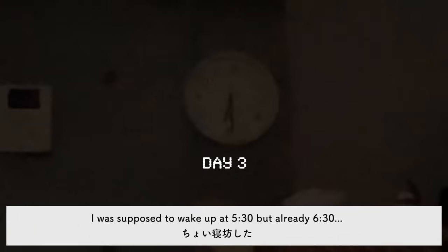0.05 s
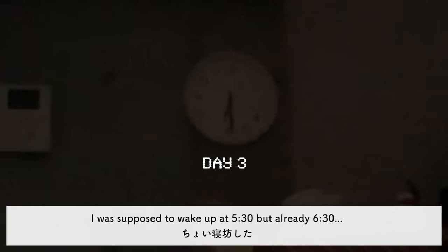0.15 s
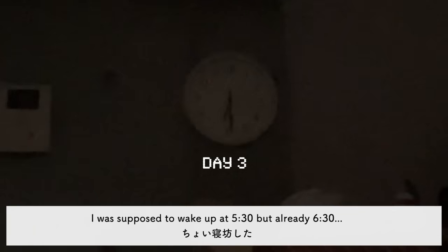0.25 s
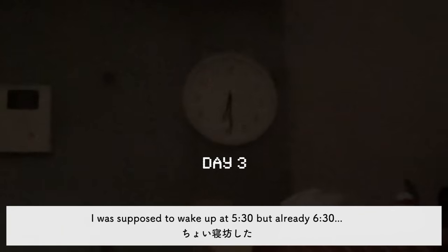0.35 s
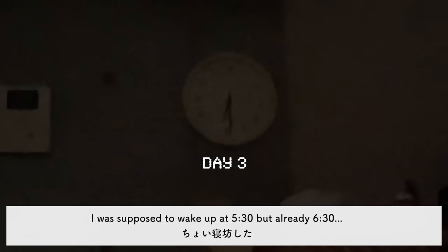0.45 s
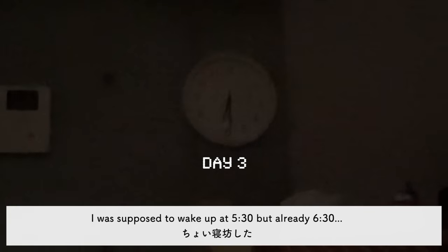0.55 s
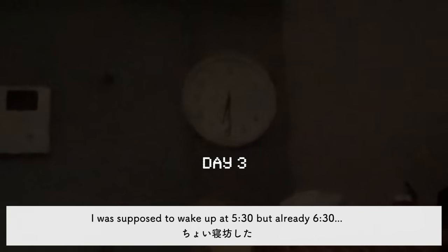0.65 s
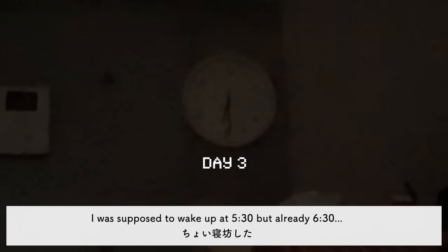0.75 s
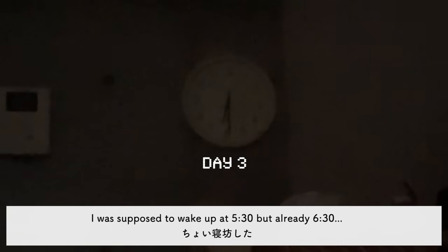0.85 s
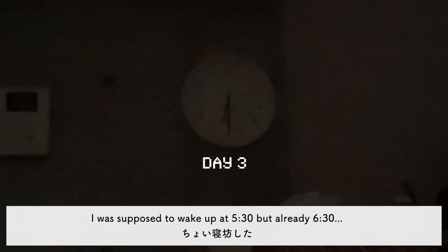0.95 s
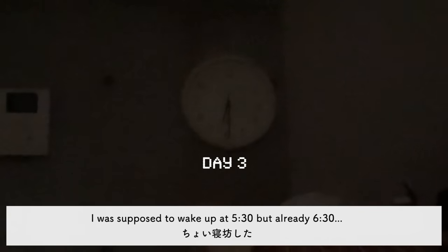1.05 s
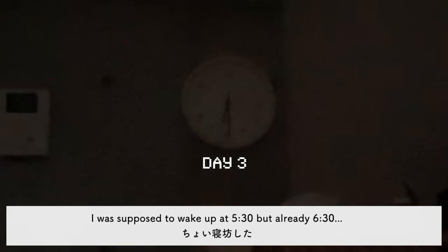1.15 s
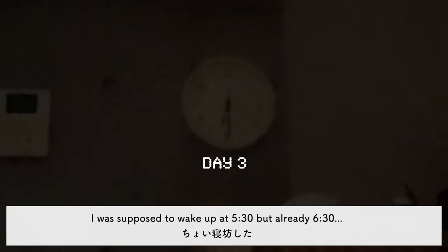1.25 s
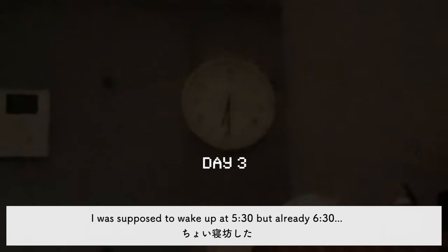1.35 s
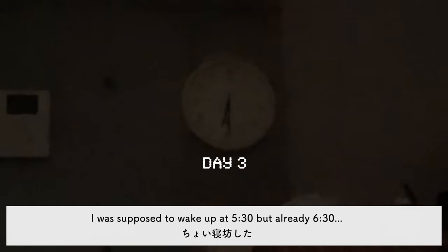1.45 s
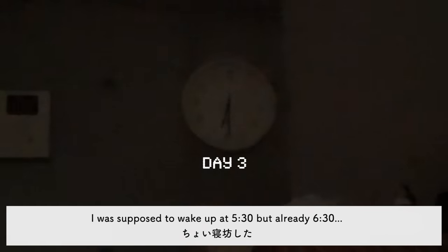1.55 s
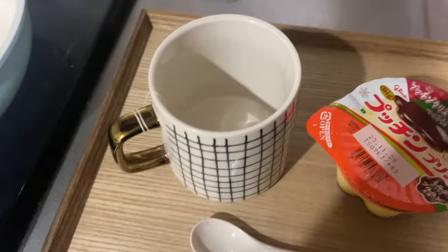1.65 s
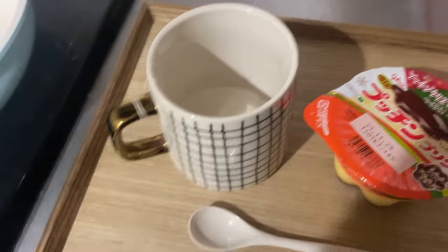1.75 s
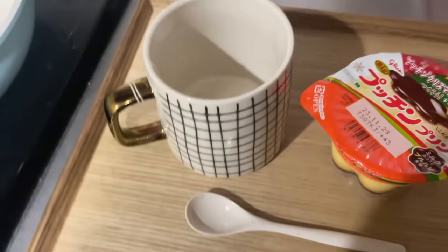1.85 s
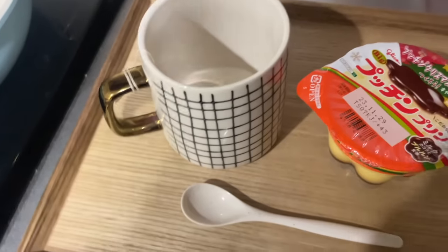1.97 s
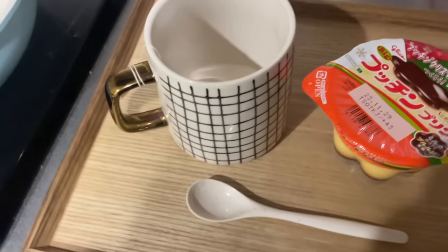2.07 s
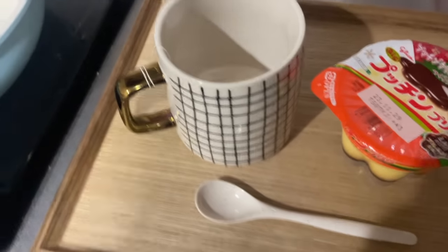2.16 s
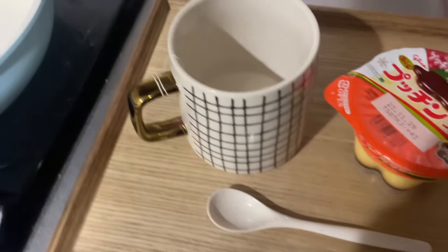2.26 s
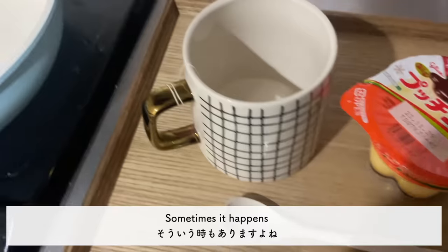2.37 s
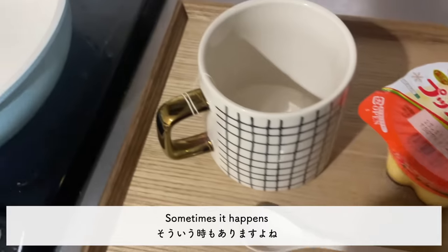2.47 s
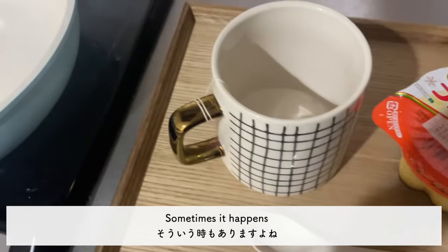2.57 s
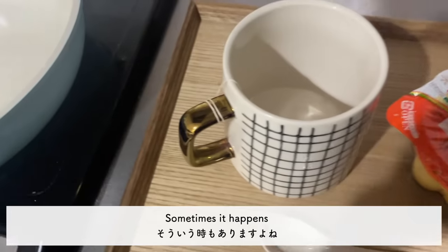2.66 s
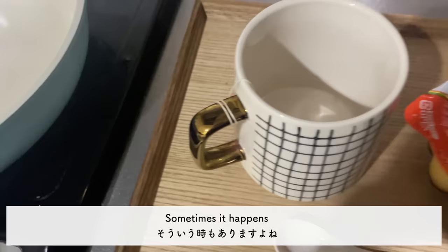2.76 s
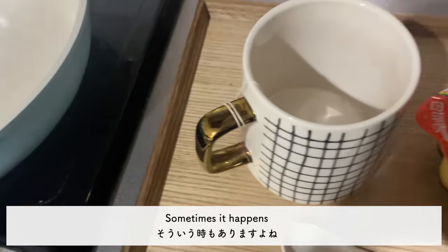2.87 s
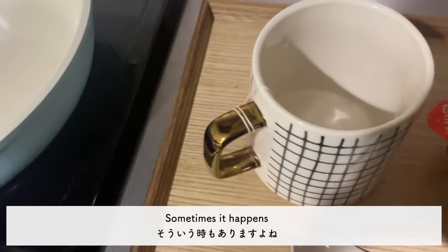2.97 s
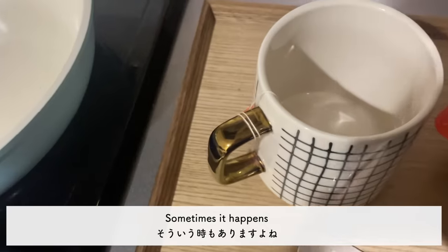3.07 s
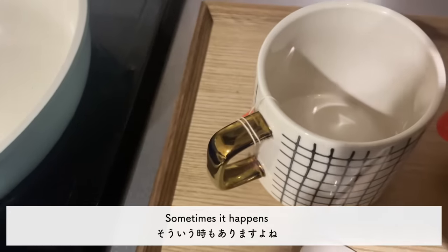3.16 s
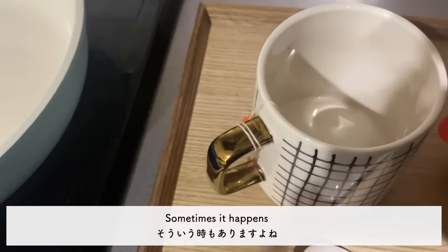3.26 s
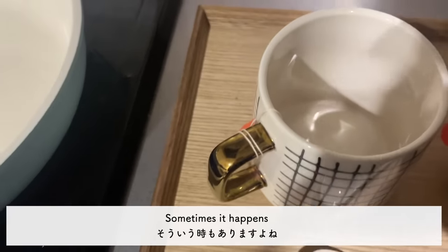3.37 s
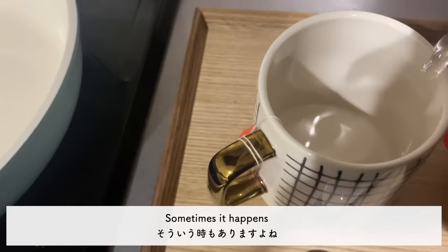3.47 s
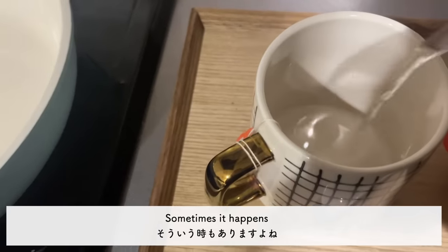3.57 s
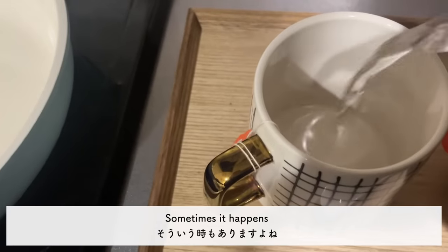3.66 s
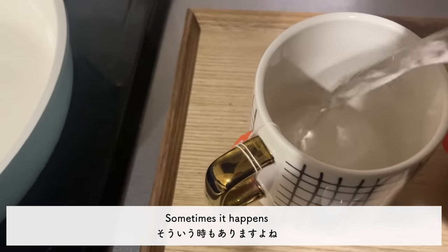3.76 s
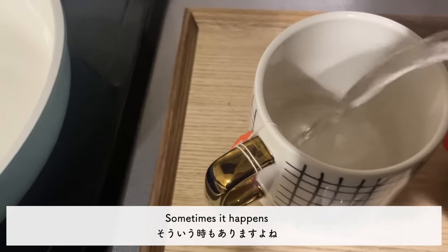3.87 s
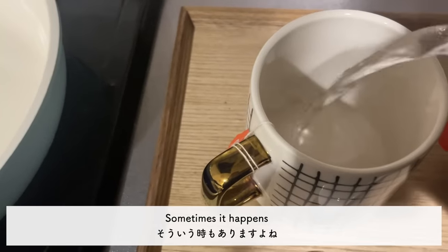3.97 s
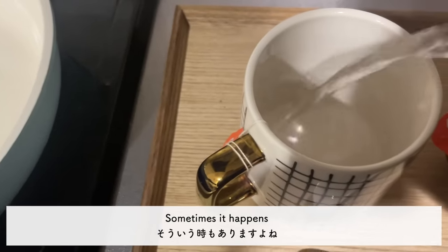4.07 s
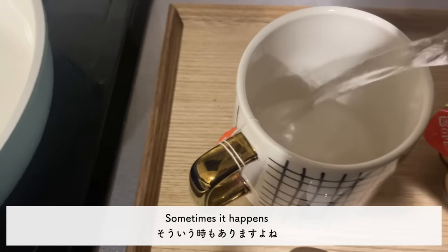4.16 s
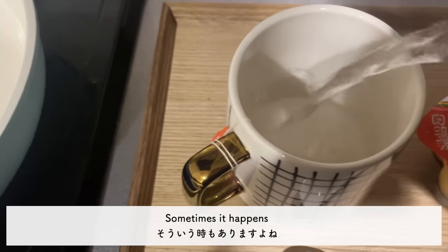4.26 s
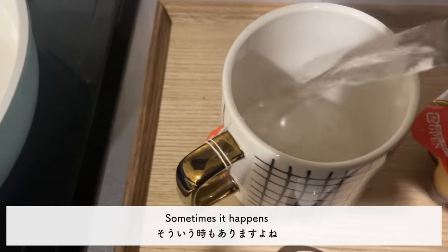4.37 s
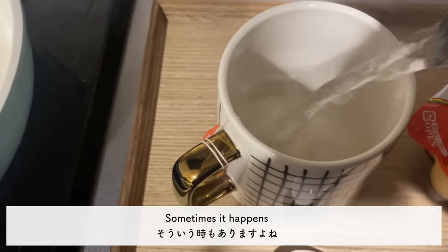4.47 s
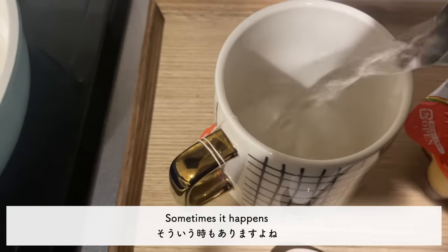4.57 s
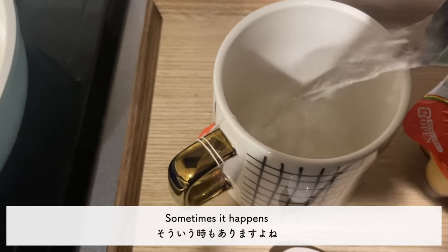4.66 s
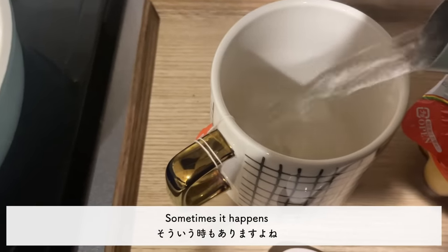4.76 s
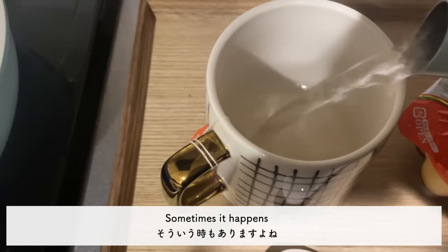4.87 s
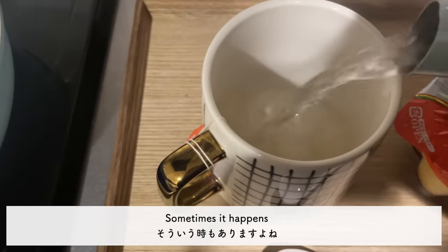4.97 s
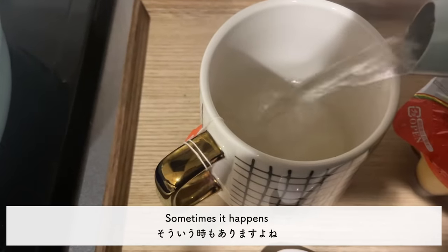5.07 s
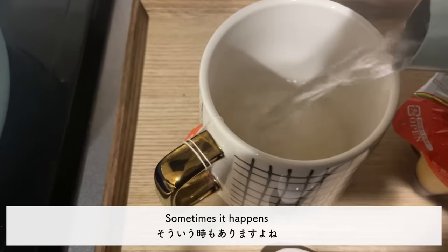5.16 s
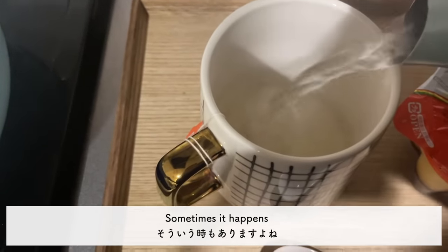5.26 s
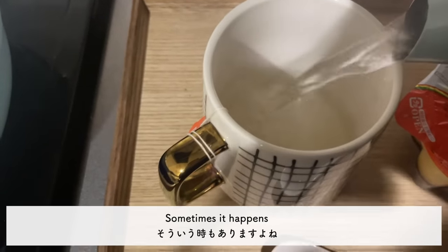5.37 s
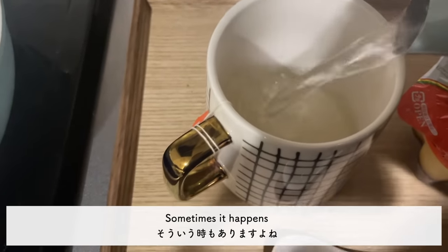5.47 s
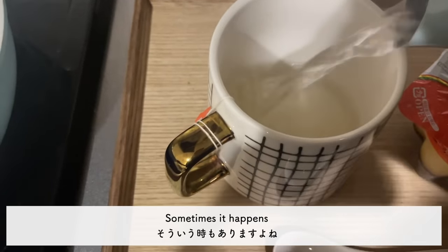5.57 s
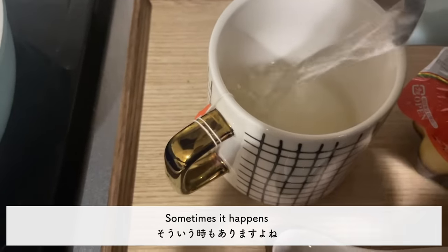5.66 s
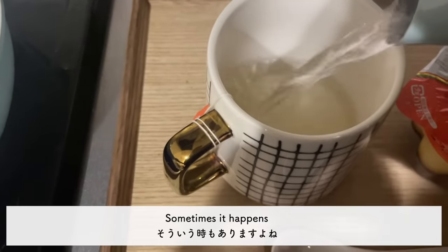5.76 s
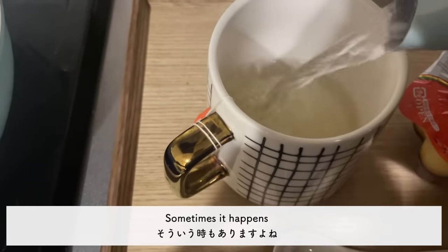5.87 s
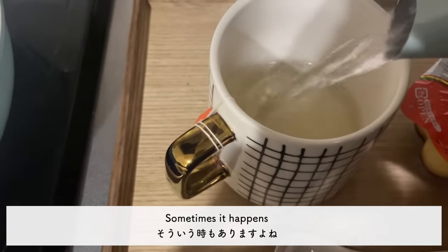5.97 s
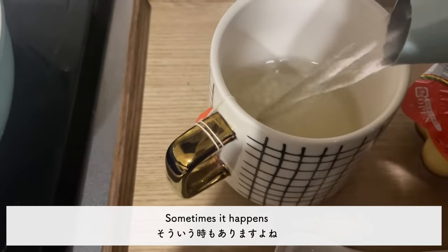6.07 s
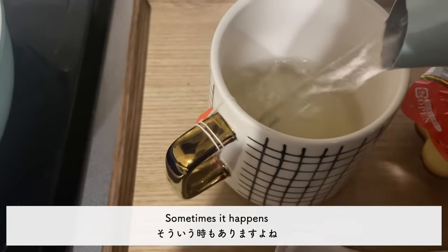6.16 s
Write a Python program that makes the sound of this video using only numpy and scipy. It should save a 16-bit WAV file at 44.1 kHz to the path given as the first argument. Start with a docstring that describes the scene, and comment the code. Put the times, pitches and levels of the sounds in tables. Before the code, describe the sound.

Near-silence breaks into low kitchen rumble with floor thuds and small clicks, a firm kettle knock, then water splashing and gurgling into a ceramic mug.

```python
"""Pouring water into a mug

A hushed room gives way at once to a kitchen with a low rumble: low thuds on the floor and under a kettle's knock,
light clicks and rustles, made of filtered noise and dying modes. Water then pours into a ceramic mug: grains of noise
spatter on the bare bottom, then decaying sines plop as cavities that widen further while the water deepens. All but
the clear bubbles and deep glugs ring the mug and its air column; a close pair of microphone ports hears the pour."""
import sys
import numpy as np
from scipy import signal
from scipy.fft import rfft, irfft, next_fast_len
from scipy.io import wavfile
from scipy.ndimage import uniform_filter1d

SR = 44100
rng = np.random.default_rng(int(sys.argv[2]) if len(sys.argv) > 2 else 0)


def field_ratio(decibels):
    """Amplitude ratio for a level in dB (20 dB per decade); scalars and array-likes work."""
    return 10 ** (np.asarray(decibels, dtype=float) / 20)


def generate_wav(signal):
    """Clip the signal to [-1, 1] and save it as 16-bit WAV at the path in sys.argv[1]."""
    frames = np.transpose(np.atleast_2d(signal))
    scaled = np.clip(frames, -1, 1) * 32767
    pcm = np.round(scaled).astype(np.int16)
    wavfile.write(sys.argv[1], SR, pcm)


N = 274335

KITCHEN_S = 1.667  # the hush ends and the kitchen begins
HUSH_DB, KITCHEN_DB = -60.5, -54  # background levels
# Noise of the hushed room. Each row: frequency in Hz, relative density in dB per Hz.
HUSH_TONE = [(15, -25), (25, -8), (60, -1.5), (90, -7), (103, -15.5), (153, -17.5), (184, -25.5),
             (228, -22), (290, -28.5), (679, -30.5), (755, -28.5), (1190, -34), (2080, -45.5),
             (13400, -60.5), (14500, -61)]
# Noise of the kitchen. Each row: frequency in Hz, relative density in dB per Hz.
KITCHEN_TONE = [(59, -26), (100, -0.5), (209, -18), (281, -15.5), (457, -23), (682, -26), (791, -20),
                (977, -28.5), (1340, -32), (1590, -38.5), (2220, -43.5), (2690, -49.5), (7410, -63.5),
                (13100, -55.5), (15500, -79)]
# Course of the low rumble of the kitchen floor. Each row: time in seconds, level in dB.
RUMBLE_LEVEL = [(1.67, -42.5), (1.95, -50), (2.3, -51.5), (2.48, -63.5), (2.57, -50.5), (3.04, -48.5),
                (3.13, -56.5), (3.3, -49), (3.7, -48), (4.3, -49.5), (4.7, -47.5), (5.0, -46.5), (5.5, -55),
                (6.22, -48)]
# Colour of the rumble. Each row: frequency in Hz, relative density in dB per Hz.
RUMBLE_TONE = [(15, -18.5), (25, 2), (38, -15.5), (59, 7.5), (119, -13), (150, -8), (206, -35.5),
               (272, -15.5), (350, -34.5), (460, -61.5), (770, -120)]
# Likeness of the room noise in the two channels. Each row: frequency in Hz, correlation from 0 to 1.
ROOM_SAME = [(60, 0.93), (180, 0.87), (550, 0.45), (1650, 0.028), (4970, 0.23), (15000, 0.08)]
# Balance of the room noise. Each row: frequency in Hz, left minus right in dB.
ROOM_TILT = [(60, -2), (240, -2.5), (950, 0), (3770, 2), (15000, -0.5)]
# Low thuds: on the floor, and under the kettle's knock.
# Each row: start in seconds, level in dB, push frequency in Hz, push share from 0 to 1.
THUDS = [(1.666, -26, 152, 0.2), (1.722, -23, 159.6, 0.27), (1.865, -35, 144, 0.67),
         (2.008, -49, 335, 0.68), (2.029, -54, 325, 0.73), (2.033, -33, 83, 0.95), (2.305, -47, 306, 0.77),
         (2.842, -65, 207, 0.3), (3.209, -42, 250, 0.48), (3.461, -25, 68.6, 0.58),
         (3.5, -19.5, 97.6, 0.62), (3.599, -29.5, 57.5, 0.75)]
# Modes of the floorboards. Each row: frequency in Hz, relative level in dB, 60 dB decay time in seconds.
FLOORBOARDS = [(51.4, -7.5, 0.31), (110.6, -11.5, 0.63), (144.9, -2.5, 0.24), (152.8, -4, 0.38),
               (270, -16, 0.13), (359.9, -7.5, 0.1), (335, -20, 0.11), (401.6, -14, 0.12),
               (542, -25, 0.062), (808, -30, 0.087)]
# Light clicks. Each row: start in seconds, level in dB before CLICK_TONE, centre in Hz,
# 60 dB decay time in seconds, left minus right in dB.
CLICKS = [(1.757, -55.5, 1556, 0.12, 3), (2.021, -45, 4060, 0.021, -2), (2.023, -54, 2380, .04, -1),
          (2.294, -57, 2000, 0.022, 1.5), (2.3, -39, 1770, 0.02, -11), (2.303, -52.5, 794, 0.024, 14.5),
          (2.308, -51, 2200, 0.048, 3), (2.317, -43, 3630, 0.0098, -7), (2.608, -67.5, 12900, 0.0125, 4.5),
          (2.692, -58, 1800, 0.0154, 1.5), (2.7, -48.5, 968, 0.0115, -14), (2.7, -50, 1600, 0.034, 5),
          (2.727, -58, 1990, 0.0145, 1), (2.754, -61, 2200, 0.012, 10), (3.518, -48.5, 1600, 0.31, 4)]
# Narrow pings. Each row: start in seconds, level in dB before CLICK_TONE, centre in Hz,
# 60 dB decay time in seconds, left minus right in dB.
PINGS = [(0.702, -65, 1080, 0.1, -1), (2.022, -56, 920, 0.034, -0.5), (2.3015, -48, 770, 0.023, 2),
         (2.305, -44.5, 1170, 0.062, 1), (2.7, -55, 950, 0.046, -6), (2.548, -67, 1380, 0.17, 4.5),
         (3.557, -62, 6740, 0.125, 22)]
# How sharp sounds reach the microphone. Each row: frequency in Hz, gain in dB.
CLICK_TONE = [(200, -8), (800, 2), (6500, -7.5), (8600, -14.5), (10500, -13), (13200, 3.5), (16000, -24)]
# Rustles of things being moved. Each row: start, swell and fade in seconds, peak level in dB.
RUSTLES = [(1.666, 0.0096, 0.46, -83), (1.75, 0.011, 0.065, -67.5), (2.06, 0.059, 0.067, -71.5),
           (2.336, 0.0078, 0.12, -73), (3.121, 0.13, 0.78, -74)]
# Colour of the rustles. Each row: frequency in Hz, relative density in dB per Hz.
RUSTLE_TONE = [(880, -10.5), (1500, -6.5), (2380, -13), (2890, -10.5), (3500, -10.5), (6490, -15.5),
               (8250, -33.5), (13100, -15.5), (15000, -54)]
# Knocks of the kettle on its stand. Each row: start in seconds, level in dB, treble emphasis in dB,
# length of the blow in seconds, freedom of the stand as a factor on its decay times.
KNOCKS = [(3.453, -28, -3, 0.0028, 0.3), (3.4845, -22, 4, 0.00088, 0.38), (3.488, -14, -5, 0.00069, 0.67),
          (3.501, -30.5, -11.5, 0.0025, 0.56), (3.514, -31.5, -0.5, 0.003, .7),
          (3.522, -32.5, -18, 0.0024, 0.79), (3.538, -35.5, -21, 0.0036, 0.92),
          (3.562, -37, -18.5, 0.002, 0.95)]
# Modes of the stand. Each row: frequency in Hz, relative level in dB, 60 dB decay time in seconds when free.
STAND = [(269, -12.5, 0.12), (396, -9, 0.11), (548, 3, 0.026), (600, -11.5, 0.0167), (673, 5.5, 0.027),
         (830, -1, 0.031), (1000, -19, 0.022), (1260, 0, 0.029), (1600, -15, 0.018), (2000, -6.5, 0.026),
         (2070, -15, 0.02), (2333, -5, 0.024), (2800, -16, 0.01)]
# Noise of the impact. Each row: frequency in Hz, relative density in dB per Hz.
CRACK_TONE = [(180, -17.5), (300, -6.5), (1310, -16.5), (1790, -40), (2280, -33), (2730, -25.5),
              (6620, -40.5), (8600, -56), (12500, -37.5), (15000, -74)]
# Balance of the knocks. Each row: frequency in Hz, left minus right in dB.
HANDS_TILT = [(60, 5), (110, -3), (200, -8), (380, -5), (700, -1), (1290, 8), (2380, 4), (4400, 13.5),
              (8120, 10), (15000, -2)]
# Reverberation of the kitchen. Each row: frequency in Hz, 60 dB decay time in seconds.
KITCHEN_TAIL = [(250, 0.36), (660, 0.14), (1740, 0.068), (4590, 0.09), (10000, 0.035)]
# The stream thickens, then the deepening water muffles the spatter.
# Each row: time in seconds, spatter level and gurgle level in dB, both before the mug's resonances.
STREAM = [(3.77, -80, -84), (3.84, -68, -82), (3.9, -69, -92), (4.0, -61, -75), (4.16, -60.5, -89),
          (4.18, -54.5, -69), (4.25, -61.5, -87), (4.3, -52, -78), (4.38, -56.5, -83), (4.395, -43, -82),
          (4.47, -46, -69.5), (4.56, -56.5, -64), (4.63, -52, -58), (4.82, -46.5, -57.5),
          (5.05, -59, -62.5), (5.25, -56.5, -64), (5.6, -58, -65), (5.93, -57, -66.5), (6.22, -64, -69)]
# Colour of the spatter. Each row: frequency in Hz, relative density in dB per Hz.
SPATTER_TONE = [(900, -11.5), (1500, -12), (2200, -12.5), (3000, -14), (4800, -8), (7000, -15.5),
                (9000, -8), (11000, -6.5), (13500, -0.5), (15300, -4), (15800, -11), (16200, -40)]
# Sharpest drops on the surface. Each row: start in seconds, level in dB before SPATTER_TONE, centre in Hz.
DROPS = [(3.779, -43.5, 2370), (3.838, -36.5, 3560), (3.975, -35.5, 2370), (4.026, -42, 3000),
         (3.871, -35.5, 13400), (3.952, -37, 12800), (4.013, -29, 2360), (4.091, -34.5, 2190),
         (4.116, -46, 14100), (4.127, -44, 3500), (4.149, -36.5, 5000), (4.171, -24.5, 5100),
         (4.182, -34, 6360), (4.219, -31, 4500), (4.258, -36, 6500), (4.275, -30, 12900),
         (4.346, -31, 2970), (4.389, -27.5, 3000), (4.442, -25, 2590), (4.457, -14, 13700),
         (4.478, -23, 12500), (4.496, -15, 3850), (4.511, -26, 3260), (4.537, -25.5, 2630),
         (4.602, -25, 2890), (4.665, -25, 2560), (4.712, -35, 4730), (4.756, -22, 3520),
         (4.832, -23.5, 13000), (4.879, -25.5, 3040), (4.926, -36, 13000), (4.935, -35, 12500),
         (4.96, -30, 6000), (5.053, -33, 13000), (5.09, -41, 12500), (5.126, -32, 13000),
         (5.175, -39, 13000), (5.213, -36, 13000), (5.343, -37, 7000), (5.403, -27, 13000),
         (5.446, -23, 7100), (4.972, -22, 2435), (5.007, -21.5, 11800), (5.102, -27, 3100),
         (5.12, -36, 13000), (5.235, -21.5, 13460), (5.302, -28, 12100), (5.357, -35, 12000),
         (5.392, -24.5, 3440), (5.436, -28, 3170), (5.48, -23.5, 13570), (5.547, -26.5, 12800),
         (5.612, -28, 7240), (5.735, -20.5, 10700), (5.517, -29, 12500), (5.589, -33, 13000),
         (5.64, -29, 13000), (5.685, -36, 12500), (5.767, -32, 12500), (5.789, -34, 13000),
         (5.8, -32, 12000), (5.808, -30, 13000), (5.828, -26.5, 3170), (5.9, -34, 12500),
         (5.977, -31, 13000), (5.995, -28, 13000), (6.103, -30.5, 13000), (6.165, -38, 13000),
         (6.196, -30, 13000), (5.962, -31, 3000), (5.984, -29, 3050), (6.026, -18.5, 4600)]
# Distinct plops of air pockets closing under the surface. Each row: start in seconds, level in dB before
# the mug's resonances, nominal pitch in Hz.
PLOPS = [(4.223, -30, 2360), (4.29, -34, 1460), (4.305, -47.5, 2300), (4.354, -41, 2200),
         (4.434, -23.5, 2520), (4.533, -38, 830), (4.596, -29.5, 2350), (4.585, -36, 1500),
         (4.611, -26, 1910), (4.666, -22, 1720), (4.818, -26.5, 1460), (4.93, -29, 1150),
         (4.961, -33.5, 900), (4.99, -33.5, 1000), (5.0, -24.5, 1690), (5.018, -42, 896),
         (5.043, -35.5, 890), (5.055, -38, 1000), (5.109, -31.5, 1180), (5.133, -31, 1700),
         (5.143, -25.5, 1360), (5.157, -33.5, 1600), (5.172, -38, 1110), (5.202, -30, 1040),
         (5.214, -21.5, 1050), (5.242, -29.5, 950), (5.263, -26.5, 1170), (5.236, -27, 1216),
         (5.269, -32, 964), (5.278, -40, 1000), (5.284, -31, 1300), (5.299, -32, 1160), (5.316, -36, 1220),
         (5.328, -38, 1110), (5.344, -32.5, 960), (5.37, -39, 945), (5.396, -39, 1240), (5.36, -32, 955),
         (5.409, -35, 965), (5.438, -31, 1393), (5.446, -25.5, 930), (5.457, -32.5, 870),
         (5.481, -35, 1050), (5.498, -35, 1000), (5.518, -24.5, 2130), (5.533, -30.5, 1040),
         (5.56, -43, 1000), (5.59, -28.5, 819), (5.617, -37.5, 1000), (5.634, -38.5, 1300),
         (5.64, -28, 780), (5.685, -24.5, 950), (5.73, -35, 1000), (5.741, -42, 660), (5.766, -24.5, 880),
         (5.695, -38.5, 1600), (5.789, -27.5, 1000), (5.808, -32.5, 990), (5.841, -28, 1000),
         (5.853, -40, 970), (5.863, -41, 950), (5.9, -33, 1280), (5.903, -34.5, 932), (5.917, -28.5, 903),
         (5.943, -43, 950), (5.957, -37, 906), (5.977, -35, 1000), (5.985, -37, 1000), (5.996, -37.5, 1000),
         (6.018, -30, 1500), (6.028, -22.5, 1050), (6.038, -36, 1120), (6.06, -31, 1050),
         (6.072, -31.5, 1050), (6.089, -38, 1380), (6.103, -28.5, 1050), (6.119, -37, 890),
         (6.152, -37, 1240), (6.196, -28.5, 796)]
# Bubbles that ring clearly. Each row: start in seconds, level in dB, starting pitch in Hz.
BUBBLES = [(4.181, -39.5, 1970), (4.188, -36, 2670), (4.397, -36, 2800), (4.402, -32, 2640),
           (4.448, -32.5, 2350), (4.461, -42, 826), (4.623, -42, 882), (4.636, -42, 1081),
           (4.65, -38, 1250), (4.672, -32, 1050), (4.679, -40, 1240), (4.692, -30.5, 1100),
           (4.719, -43, 1120), (4.733, -33, 840), (4.759, -31.5, 835), (4.782, -29.5, 1220),
           (4.789, -35, 1290), (4.808, -36.5, 800), (4.844, -54, 850), (4.882, -36, 1220),
           (4.895, -36, 1096), (4.914, -39.5, 808), (4.935, -52, 1062)]
# Modes of the mug and its air. Each row: frequency in Hz, bandwidth in Hz, gain in dB.
MUG = [(1050, 150, -1.5), (1260, 240, -9), (1625, 280, -4.5), (2350, 92, -4), (2890, 183, 0),
       (3170, 680, -4.5), (4460, 66, -4), (7020, 606, 7)]
# Balance of the pour at the ports. Each row: frequency in Hz, left minus right in dB.
PORT_TILT = [(300, 0), (950, 5), (2400, 2.5), (6000, 3.5), (15000, -0.5)]
# Phase between the ports. Each row: frequency in Hz, radians by which left leads at a lead factor of 1.
PORT_LEAD = [(100, 0), (950, .1), (2150, .9), (3800, 1.7), (5200, 1.5), (6200, -1.4), (7580, -2.6),
             (10100, -3.9), (13000, -6.1), (16400, -6.5)]

POUR_S = STREAM[0][0]  # the water arrives
# the hollow dug by the jet grows louder until HOLLOW_S, when it has this pitch and gain; it sinks throughout
HOLLOW_S, HOLLOW_HZ, SINK_HZ_PER_S, HOLLOW_DB, GROW_DB_PER_S = 5.63, 466, 117, 17, 17


def evened(x):
    """Normalisation: equal mean power, at rms 1."""
    return x / np.sqrt(np.mean(x ** 2) + 1e-20)


def read(points, hz):
    """Spectral interpolation along a logarithmic frequency axis."""
    f, value = np.transpose(points)[:2]
    return np.interp(np.log(hz + 1), np.log(f + 1), value)


def curve(rows, axis=1):
    """Linear interpolation in time of one column of a table."""
    rows = np.array(rows)
    return np.interp(np.arange(N) / SR, rows[:, 0], rows[:, axis])


def add(mix, s, sound):
    """Superposition: pressures sum from time s onward."""
    part = mix[..., round(s * SR):][..., :sound.shape[-1]]
    part += sound[..., :part.shape[-1]]


def sides(db, tilt_db):
    """Level difference between the channels: left and right gains about a mean of db."""
    return field_ratio(db + np.array([[tilt_db / 2], [-tilt_db / 2]]))


def drift(size):
    """Slow random fluctuation of rms 1: noise averaged twice over size samples."""
    return evened(uniform_filter1d(uniform_filter1d(rng.standard_normal(N), size), size))


def colour(x, points):
    """Minimum-phase filtering: a causal response follows from its log-magnitude spectrum."""
    hz = abs(np.fft.fftfreq(4096, 1 / SR))
    log_gain = np.log(field_ratio(np.maximum(read(points, hz), -100)))
    taps = np.fft.ifft(np.exp(np.conj(signal.hilbert(log_gain)))).real[:2048]
    return signal.oaconvolve(x, taps)[:len(x)]


def resonate(x, hz, width):
    """Resonance of unit gain by heterodyne: shift hz down to zero, smooth, shift back."""
    turn = np.exp(2j * np.pi * np.cumsum(hz * np.ones(len(x))) / SR)
    r = np.exp(-np.pi * width / SR)
    return 2 * (turn * signal.lfilter([1 - r], [1, -r], x / turn)).real


def burst(hz, t60, spread, rise):
    """Transient noise: a band around hz swells briefly and decays exponentially, peak 1."""
    t = np.arange(min(SR // 8, round(SR * max(1.5 * t60, 0.045)))) / SR
    puff = resonate(rng.standard_normal(len(t)), hz, spread * hz)
    puff = resonate(puff, hz, 2 * spread * hz)
    puff = puff * field_ratio(-60 * t / t60) * (1 - np.exp(-t / rise))
    return puff / abs(puff).max()


def ring(modes, blur, rough, uneven_db, detune):
    """Modal vibration: a ragged blow of about blur seconds excites decaying modes, peak 1."""
    t = np.arange(SR // 2) / SR
    sound = np.zeros(len(t))
    for hz, db, t60 in modes:
        # each blow lands elsewhere and wakes the modes differently
        luck_db, luck_hz = rng.uniform(-1.1, 1, 2)
        decay = field_ratio(db + uneven_db * luck_db - 60 * t / t60)
        tone = decay * np.sin(2 * np.pi * hz * (1 + detune * luck_hz) * t)
        ragged = rng.standard_normal(2000) * (t * np.exp(-t / blur))[:2000]
        rattle = signal.fftconvolve(tone, ragged / np.linalg.norm(ragged))[:len(t)]
        sound += tone * (1 - np.exp(-t / blur)) ** 2 + rough * rattle
    return sound / abs(sound).max()


def pocket(hz, cycles, fall):
    """Bubble resonance: enclosed air rings a few cycles, its pitch falling by the share fall as it widens."""
    t = np.arange(SR // 25) / SR
    turns = np.cumsum(hz * (1 - fall + fall * np.exp(-t * hz / 1.93))) / SR
    onset = 1 - np.exp(-turns / 0.5)  # in cycles
    return np.sin(2 * np.pi * turns) * np.exp(-turns / cycles) * onset


def pockets(low_hz, high_hz, count, cycles):
    """Bubble sizes in geometric series; most slide up in pitch as they rise."""
    glides = rng.uniform(-0.18, 0.012, size=count)
    return [pocket(hz, cycles, g) for hz, g in zip(np.geomspace(low_hz, high_hz, num=count), glides)]


def scatter(per_s, spread_db, clump_db, templates):
    """Random point process: grains of several kinds come in clumps and a few are large."""
    size_db = spread_db * np.minimum(rng.exponential(1, N), 3.5) + clump_db * drift(500)
    size = field_ratio(size_db) * (rng.random(N) < per_s / SR)
    kind = rng.integers(0, len(templates), N)
    return evened(sum(signal.oaconvolve(size * (kind == k), g)[:N] for k, g in enumerate(templates)))


def ports(x, tilt, lead):
    """Spaced reception: two microphone ports hear a source with different phase and colour."""
    size = next_fast_len(N)
    hz = np.fft.rfftfreq(size, 1 / SR)
    half = field_ratio(read(tilt, hz) / 2) * np.exp(0.5j * lead * read(PORT_LEAD, hz))
    return irfft(rfft(x, size) * np.array([half, 1 / half]), size)[:, :N]


def air(points, patchy_db, size=2048):
    """Partly coherent room noise: random short-time spectra with drifting patches, in two channels."""
    frames, hz = 4 * N // size + 5, np.fft.rfftfreq(size, 1 / SR)
    a, b, c, d, patches = rng.standard_normal((frames, len(hz), 5)).T
    patches = evened(uniform_filter1d(uniform_filter1d(patches, size=8, axis=0), size=8, axis=1))
    same = read(ROOM_SAME, hz)[:, None]
    left = a + 1j * b
    right = same * left + np.sqrt(1 - same ** 2) * (c + 1j * d)
    tilt_db = read(ROOM_TILT, hz)[:, None] / 2
    gain_db = read(points, hz)[:, None] + patchy_db * patches + np.array([tilt_db, -tilt_db])
    z = np.array([left, right]) * field_ratio(gain_db)
    return evened(signal.istft(z, nperseg=size, noverlap=3 * size // 4)[1][:, :N])


def backgrounds():
    """Random noise: the hush yields to kitchen, rumble and a wavering hum, under a faint high whine."""
    hum = resonate(rng.standard_normal(N), 49.2, width=10.3)
    hum = sides(0, -2.4) * evened(resonate(hum, 49.2, width=33))
    rumble = field_ratio(curve(RUMBLE_LEVEL)) * (air(RUMBLE_TONE, patchy_db=1.5, size=4096) + 0.96 * hum)
    kitchen = rumble + field_ratio(KITCHEN_DB) * air(KITCHEN_TONE, patchy_db=2.0)
    hush = field_ratio(HUSH_DB) * air(HUSH_TONE, patchy_db=1.5, size=4096)
    whine = field_ratio(-104) * evened(resonate(rng.standard_normal(N), 12800, width=65))
    return whine + np.where(np.arange(N) / SR > KITCHEN_S, kitchen, hush)


def thuds():
    """Impact on a plate, also under the kettle's knock: a low push, ringing boards and a rough scuff."""
    out, t = np.zeros((2, N)), np.arange(SR // 2) / SR
    for s, db, hz, share in THUDS:
        push = np.sin(2 * np.pi * hz * t) * hz * t * np.exp(1 - hz * t)
        boards = ring(FLOORBOARDS, blur=0.0096, rough=0.22, uneven_db=1.5, detune=0.02)
        add(out, s, sides(db, -3.6) * (share * push + (1 - share) * boards))
        scuff = burst(790, t60=0.21, spread=0.77, rise=0.0072)
        add(out, s, field_ratio(db - 27.5) * (1 - share) * scuff)
    return out


def clicks():
    """Short contacts: damped noise bands with a bright edge, and narrow bands that ping."""
    out = np.zeros((2, N))
    for s, db, hz, t60, tilt_db in CLICKS:
        click = burst(hz, t60, spread=0.53, rise=0.0022)
        add(click, 0, burst(3460, 0.68 * t60, spread=1.9, rise=0.00087))  # bright edge
        add(out, s, sides(db, tilt_db) * click)
    for s, db, hz, t60, tilt_db in PINGS:
        add(out, s, sides(db, tilt_db) * burst(hz, t60, spread=0.12, rise=0.0003))
    return np.array([colour(v, CLICK_TONE) for v in out])


def rustles():
    """Friction noise: independent coloured noise on each side swells and fades."""
    out, t = np.zeros((2, N)), np.arange(SR // 2) / SR  # each is cut at half a second
    for s, swell, fade, db in RUSTLES:
        noise = np.array([evened(colour(v, RUSTLE_TONE)) for v in rng.standard_normal((2, len(t)))])
        from_peak = np.maximum(1 - t / swell, (t - swell) / fade)
        shape = field_ratio(db - 13.5 * from_peak) * (t < swell + fade)
        add(out, s, shape * noise)
    return out


def kettle_knocks():
    """Impact of two bodies: a broadband crack and the modes of the stand, damped by how freely it rings."""
    out, t = np.zeros(N), np.arange(SR // 2) / SR
    for s, db, treble_db, blur, free in KNOCKS:
        crack = evened(colour(rng.standard_normal(len(t)), CRACK_TONE))
        crack = crack * field_ratio(-60 * t / 0.035) * (1 - np.exp(-t / 0.000065))
        # the emphasis tilts the modes by half its value per octave
        stand = [(hz, mode_db + treble_db * np.log2(hz / 270) / 2, t60 * free) for hz, mode_db, t60 in STAND]
        body = ring(stand, blur, rough=0.15, uneven_db=1.0, detune=0.008)
        add(out, s, field_ratio(db) * (0.3 * field_ratio(treble_db) * crack + 0.85 * body))
    return ports(out, HANDS_TILT, lead=0.16)


def spatter():
    """Impact noise of a broken jet: specks, smooth hiss and broad splashes, landing in quick spurts."""
    specks = [burst(hz, t60=0.0036, spread=0.1, rise=0.00072)[:500]
              for hz in np.geomspace(1800, 15000, num=14)]
    sprays = [burst(hz, t60=0.0022, spread=0.57, rise=0.0011)[:500]
              for hz in np.geomspace(5000, 13000, num=6)]
    grains = scatter(per_s=3200, spread_db=6.5, clump_db=3.0, templates=specks)
    grains += 0.55 * rng.standard_normal(N)  # hiss
    grains += 0.6 * scatter(per_s=300, spread_db=9.0, clump_db=-1.5, templates=sprays)
    spurts = field_ratio(3.0 * drift(200))
    return field_ratio(curve(STREAM)) * evened(colour(grains * spurts, SPATTER_TONE))


def gurgle():
    """Entrained air: a dense random train of small ringing bubbles."""
    small = [p[:900] for p in pockets(820, 3000, count=14, cycles=3.0)]
    return field_ratio(curve(STREAM, axis=2)) * scatter(per_s=1400, spread_db=4.0, clump_db=2.0, templates=small)


def drops():
    """Surface impact: each sharp drop is a short noise band with a bright companion."""
    out = np.zeros(N)
    for s, db, hz in DROPS:
        drop = burst(hz, t60=0.0096, spread=0.438, rise=0.00086)
        drop += 0.88 * burst(9476, t60=0.0054, spread=0.35, rise=0.0028)
        add(out, s, field_ratio(db) * drop)
    return colour(out, SPATTER_TONE)


def plops():
    """Cavity resonance: closing air pockets widen and fall in pitch further as the water deepens."""
    out = np.zeros(N)
    for s, db, hz in PLOPS:
        fall = np.clip(0.395 * (s - POUR_S) - 0.1, 0.05, 0.68)
        snap = 0.24 * burst(2860, t60=0.0088, spread=1.0, rise=0.00036)[:SR // 25]  # the surface snaps shut
        add(out, s, field_ratio(db) * (pocket(hz / (1 - 0.53 * fall), 0.95, fall) + snap))
    return out


def clear_bubbles():
    """Bubble resonance: single bubbles ring clearly and slide up as they rise."""
    out = np.zeros(N)
    for s, db, hz in BUBBLES:
        add(out, s, field_ratio(db) * pocket(hz, cycles=2.0, fall=-0.08))
    return out


def glugs(growth_db):
    """Large bubbles resonate low: soft ones roll in the deep water, growing with the hollow."""
    big = pockets(297, 625, count=10, cycles=3.2)
    return field_ratio(-64.5 + growth_db) * scatter(per_s=150, spread_db=3.5, clump_db=2.0, templates=big)


def hollow(source, growth_db):
    """Cavity resonance: the hollow dug by the jet sinks in pitch, shifted by the moving surface."""
    steady_hz = HOLLOW_HZ - SINK_HZ_PER_S * (np.arange(N) / SR - HOLLOW_S)
    return field_ratio(HOLLOW_DB + growth_db) * resonate(source, steady_hz * (1 + 0.026 * drift(900)), width=120)


def air_column(water, poured):
    """Column resonance: the air above the water shortens and its pitch climbs as the mug fills."""
    empty_hz, fill_per_s = 766, 0.093  # share of the mug's depth filled each second
    column_hz = empty_hz / (1 - fill_per_s * np.maximum(poured, 0))
    return field_ratio(7.0) * resonate(water, column_hz * (1 + 0.052 * drift(900)), width=108)


def pour():
    """Source and resonator: spatter and air pockets, heard direct and through the mug and its air."""
    t = np.arange(N) / SR
    flowing = np.clip((t - POUR_S) / 0.0072, 0, 1)
    growth_db = -GROW_DB_PER_S * np.maximum(HOLLOW_S - t, 0)
    surface = flowing * (spatter() + gurgle()) + drops()
    cavities = plops()
    water = surface + cavities
    modes = sum(field_ratio(db) * resonate(water, hz, width) for hz, width, db in MUG)
    mug = air_column(water, t - POUR_S) + hollow(cavities + 0.3 * surface, growth_db) + modes
    return 0.28 * water + mug + clear_bubbles() + flowing * glugs(growth_db)


def reverb(x):
    """Diffuse decay: sparse taps of random sign, each band dying at its own speed, separate for each side."""
    taps = np.zeros((2, SR // 2))
    at = np.arange(100, SR // 2 - 20, 20)
    at = at + rng.integers(0, 20, (2, len(at)))
    np.put_along_axis(taps, at, rng.choice([-1., 1.], at.shape), axis=1)
    hz, t, z = signal.stft(taps, SR, nperseg=256)
    t60 = read(KITCHEN_TAIL, hz)[:, None]
    tail = signal.istft(z * field_ratio(-60 * t / t60), SR, nperseg=256)[1]
    return signal.fftconvolve(x[None], tail / np.linalg.norm(tail[0]), axes=1)[:, :N]


def scene():
    """Superposition of backgrounds, handling and pour, with the kitchen's echo above the bass."""
    hands = thuds() + clicks() + rustles() + kettle_knocks()
    water = pour()
    sent = field_ratio(-3.0) * hands.mean(0) + field_ratio(-9.0) * water
    sent = signal.sosfilt(signal.butter(2, 380, "high", fs=SR, output="sos"), sent)
    return backgrounds() + hands + ports(water, PORT_TILT, lead=0.9704) + reverb(sent)


def roll_off(x):
    """The treble ends steeply here."""
    return signal.sosfilt(signal.butter(12, 16810, fs=SR, output="sos"), x)


def record(dry):
    """Band limitation: little passes below 36 Hz or above 16 kHz."""
    heard = signal.sosfilt(signal.butter(2, 36, "high", fs=SR, output="sos"), dry)
    heard = signal.sosfilt(signal.butter(8, 16000, fs=SR, output="sos"), heard)
    return roll_off(heard)


dry = scene()
out = record(dry)
generate_wav(out)
```